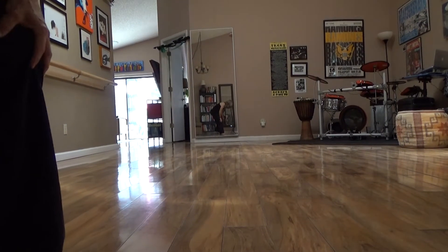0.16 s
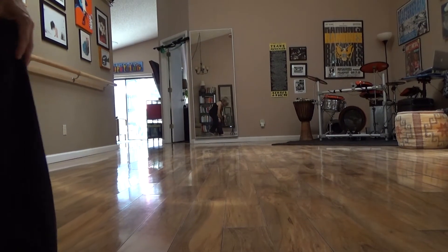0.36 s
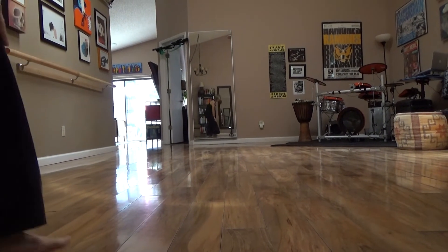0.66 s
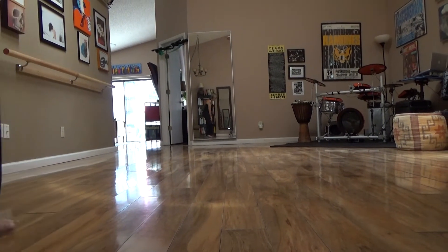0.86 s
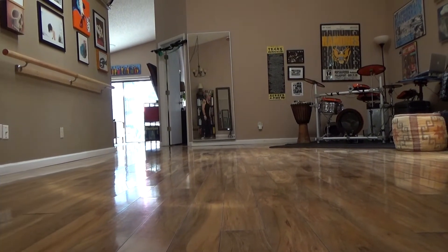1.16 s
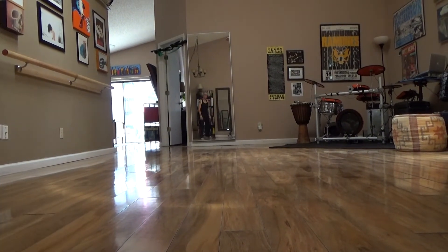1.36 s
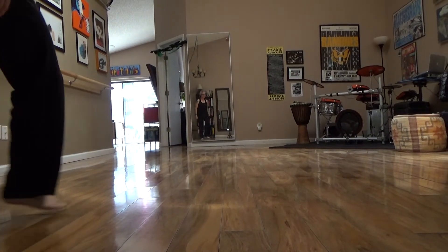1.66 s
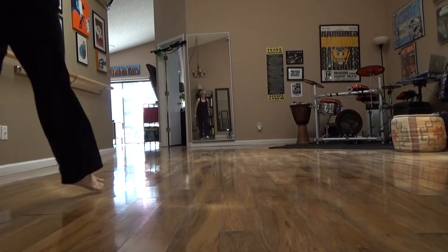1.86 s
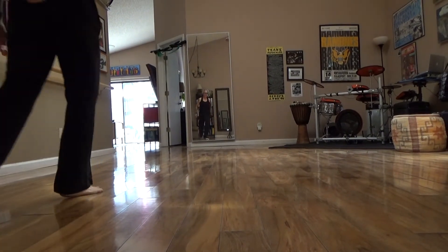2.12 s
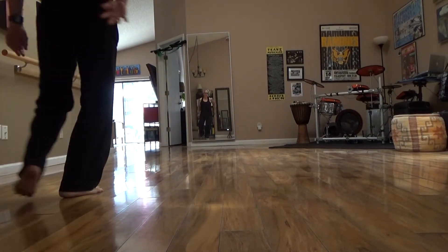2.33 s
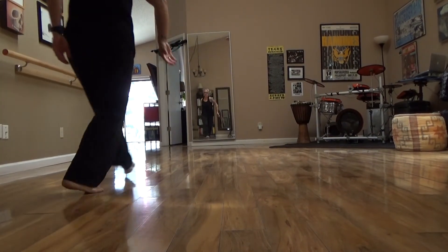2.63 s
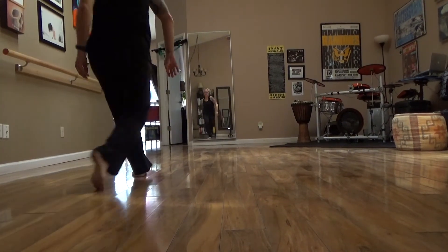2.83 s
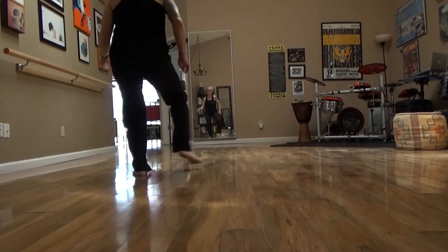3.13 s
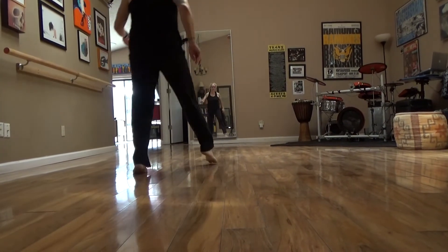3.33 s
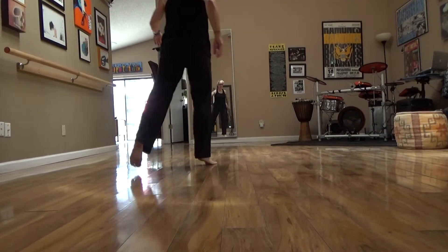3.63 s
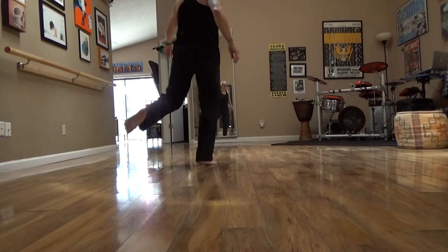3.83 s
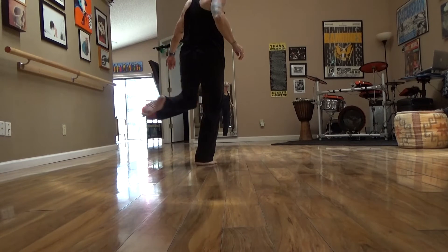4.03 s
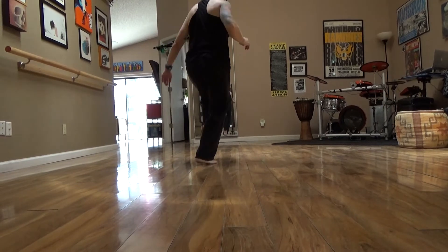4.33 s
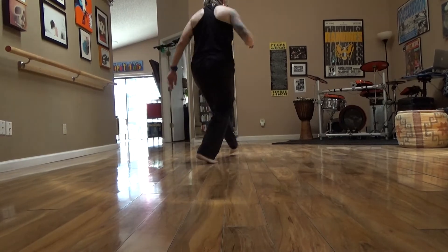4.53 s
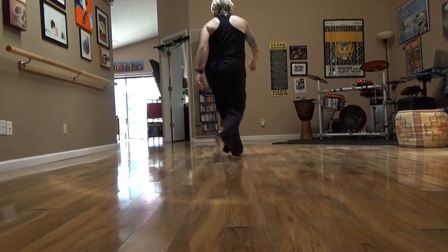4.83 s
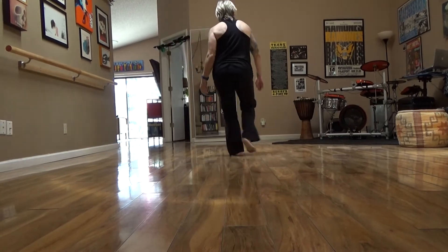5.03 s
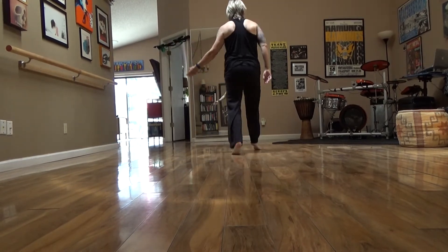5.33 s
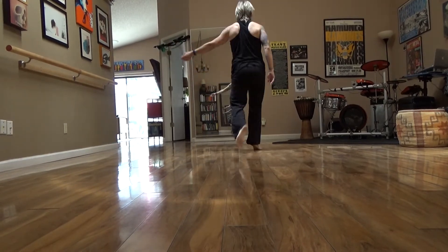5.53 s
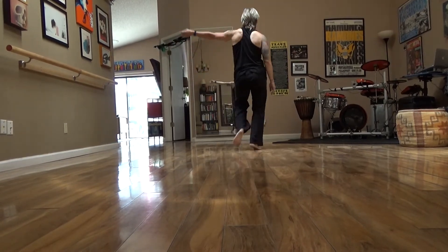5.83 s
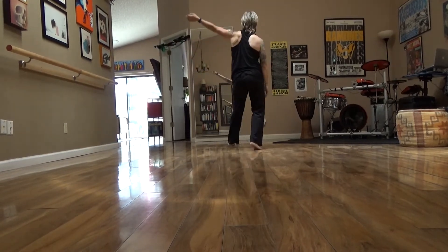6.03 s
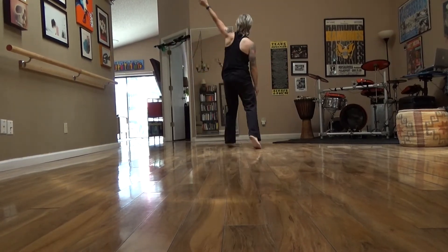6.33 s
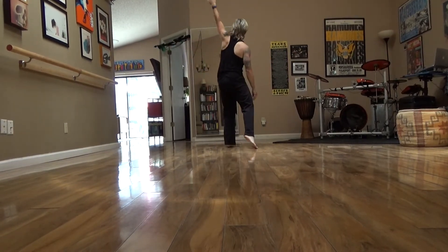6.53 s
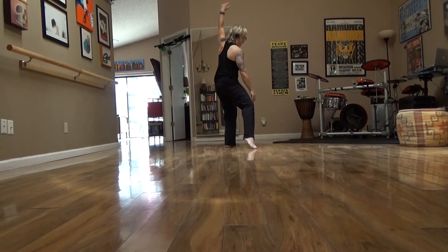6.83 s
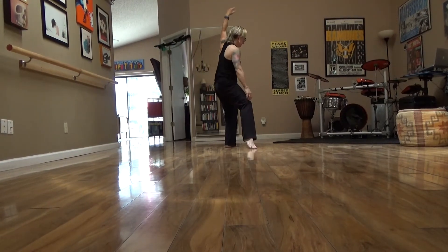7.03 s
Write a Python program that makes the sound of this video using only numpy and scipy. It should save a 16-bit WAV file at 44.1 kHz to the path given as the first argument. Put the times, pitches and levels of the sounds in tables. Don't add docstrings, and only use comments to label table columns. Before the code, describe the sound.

Bare feet rub, stick and step on a varnished wood floor right beside a low microphone, slightly left. Short dry cracks, sticky peels and light ticks come in irregular clusters, the boards ringing briefly. The walker then moves off into a lively hard-walled room, steps becoming duller and more echoing. Steady ventilation rumble, faint mains hum, a slow fan throb and soft hiss continue throughout.

```python
import sys
import numpy as np
from scipy import signal
from scipy.fft import rfft, irfft
from scipy.io import wavfile
from scipy.ndimage import uniform_filter1d

SR = 44100
rng = np.random.default_rng(int(sys.argv[2]) if len(sys.argv) > 2 else 0)


def nominal_scale(level):
    x = np.asarray(level, float) / 20
    return 10 ** x


def wav_record(signal):
    frames = np.transpose(np.atleast_2d(signal))
    bounded = np.clip(frames, -1, 1)
    quanta = np.round(bounded * 32767).astype(np.int16)
    wavfile.write(sys.argv[1], SR, quanta)


N = 316139

# f/Hz, level/dB [dB per Hz]
AIR_SPECTRUM = [(20, -24), (48, 1), (70, -2), (105, -5.5), (160, -4), (215, -9.5), (300, -19), (480, -24),
                (1030, -29), (1700, -33), (2600, -37), (9000, -42), (12000, -44), (16000, -49)]
# f/Hz, level/dB [dB per Hz]
AIR_SIDE_SPECTRUM = [(40, -89), (125, -42), (250, -32), (500, -31), (1000, -31.5), (2000, -37),
                     (4000, -43.5), (8000, -59), (16000, -76)]
# f/Hz, width/Hz, level/dB
HUM_LINES = [
    (119.6, 6.5, -55.5),
    (242, 4.9, -66.5),
    (358, 10, -73),
    (395.6, 1.65, -71.5),
    (1015, 33, -75.5),
]
# t/s [into the turn], level/dB
FAN_KNOCKS = [
    (.07, -2),
    (.19, 0.5),
]
# f/Hz, level/dB, t60/s
ROOM_TAIL = [(525, -32.5, 1), (840, -4.5, 0.79), (1330, -15.5, 1), (2130, -18, 0.99), (3280, -2, 0.77),
             (4230, -2.5, 0.71), (7160, 4, 0.41), (7700, 5.5, 0.7), (11800, 7, 0.17), (15000, -11, .4)]
# f/Hz, level/dB [side minus mid]
ROOM_SIDE_SPECTRUM = [(300, -16), (1000, -12), (3000, -8), (8000, -30), (15000, -53)]
# t/s [delay], level/dB
WALL_ECHOES = [
    (.0137, 4),
    (.0218, 6),
    (.0412, 3),
    (.054, -5),
]
# t/s, pan/dB [left minus right], wall echo level/dB, edge level/dB
WALK = [
    (0, 6, -17, 5),
    (1.5, 6.5, -25, 2.5),
    (2.0, 4, -23, -1.5),
    (2.9, 4.5, -20, -1),
    (3.5, 2, -27, 2.5),
    (4.4, 1.8, -17, -1),
    (5.3, 1, -15, 1),
    (5.7, 0.5, -4, -1.5),
    (7.17, 4.5, -20, -4.5),
]
# t/s [fastest], level/dB, rise/s, fall/s
RUBS = [(0.05, -43.5, .09, 0.056), (0.26, -66, .09, .07), (0.405, -52.5, 0.054, .07),
        (0.59, -45, .11, 0.096), (0.77, -58, .04, 0.12), (1.105, -52.5, 0.019, 0.099),
        (1.336, -53, 0.18, 0.17), (1.69, -53.5, .07, 0.14), (3.33, -52, 0.047, .05),
        (3.45, -50.5, 0.097, 0.045), (4.21, -61, .04, .06), (5.36, -53, .03, .04), (5.465, -47, 0.035, .11)]
# t/s, level/dB
BOARD_SONG = [
    (0.53, -71),
    (0.584, -51),
    (0.74, -59),
]
# t/s, peak level/dB, ring f/Hz, body
# level/dB
PEELS = [(0.0363, -27.5, 8600, -3.5), (0.046, -36, 3830, -2), (0.1354, -43, 1120, 9),
         (0.4518, -42, 3720, 0), (0.5668, -34, 1820, -17), (0.5804, -38, 2640, 8), (0.669, -36, 1680, -1),
         (0.6944, -40.5, 1740, 6), (1.2784, -42, 3230, -6), (1.3432, -38.5, 3790, -10),
         (1.348, -41, 3640, 2), (1.406, -42.5, 3010, -3), (1.4133, -38.5, 4700, -5),
         (1.4223, -35.5, 3430, 3), (1.6667, -33.5, 8900, -6), (1.6711, -51, 8900, 6),
         (2.1627, -36.5, 1800, -6), (2.1741, -33.5, 4650, 1), (2.2473, -38.5, 2760, 4),
         (2.7835, -37, 3040, -10), (3.3363, -51, 970, 6), (3.5373, -36, 6300, -9), (3.553, -41, 8830, -11),
         (4.8104, -44, 8350, -5), (4.852, -41, 4740, -4), (5.3935, -39.5, 2630, -15),
         (5.5069, -41, 1460, 1), (5.532, -41, 1610, -2), (6.74, -39.5, 4540, -2), (6.748, -36, 4520, -8)]
# t/s, peak level/dB, ring f/Hz, edge level/dB
TICKS = [(0.015, -35, 9990, -1), (0.1468, -32.5, 860, -16), (0.2927, -50, 3270, -7),
         (0.3154, -40.5, 2800, -18), (0.3357, -45, 3450, -11), (0.3699, -44, 2520, -13),
         (0.953, -41, 3490, -12), (1.1914, -41.5, 3620, -15), (1.8793, -42, 1710, -24),
         (1.9966, -42, 2450, -12), (2.2039, -32.5, 1070, -14), (2.8691, -24.5, 1640, -4),
         (3.493, -42, 3270, -12), (3.6437, -32.5, 2320, -13), (3.6646, -36, 1540, -13),
         (5.1636, -31.5, 2300, -10), (6.1692, -39, 2840, -18), (6.2631, -38.5, 2760, -2),
         (6.326, -29, 5630, 7), (6.42, -34, 5130, -4), (0.4676, -41, 2600, -12), (0.5135, -43, 3970, -18),
         (0.607, -44, 4400, -8), (0.7244, -45, 7880, -1), (5.9343, -30, 6500, -8), (6.31, -49, 2685, -12),
         (6.453, -38.5, 4000, -12), (6.7855, -37.5, 2500, -12), (0.6826, -28.5, 1670, -10),
         (1.405, -40, 3000, -12)]
# t/s, peak level/dB, ring f/Hz, body level/dB, room send level/dB
CRACKS = [(0.0297, -20.5, 2130, -2, -28), (0.521, -34.5, 6900, 1, 2), (0.5751, -19.5, 3900, -1, -9.5),
          (0.622, -34, 1750, -9, -3), (0.681, -21.5, 8400, -3, -30), (1.2759, -29, 3720, 6.5, -6),
          (2.0349, -16.5, 3216, -6.5, -2.5), (2.0665, -26.5, 4570, -18, 0.5), (2.8089, -30, 2470, -0.5, 5),
          (2.8612, -19, 8550, -15, -13), (3.3204, -27, 8900, 1, -1.5), (3.5098, -29, 2820, -3, 7.5),
          (3.9181, -30.5, 1430, -11, 1), (4.1376, -27, 2300, -19, -1.5), (4.789, -28, 10200, -18, -1.5),
          (4.8359, -27.5, 9690, -10, -3), (5.1281, -34, 2270, -4.5, 9), (5.1519, -26.5, 6890, -10, -13),
          (5.361, -36.5, 2810, 0, 10.5), (5.4717, -34, 2780, 0.5, 7.5), (5.784, -19.5, 3800, -8.5, 6.5),
          (5.882, -16.5, 8840, -6, 2), (6.3057, -32, 6000, -2.5, 6), (6.7313, -31, 1656, -0.5, 8)]

THROB_PERIOD_S, THROB_TOP_S = .5195, .19
BOARD_HZ = 1670


def colour(x, table):
    hz, db = np.transpose(table)
    n = x.shape[-1]
    log_hz = np.log(np.maximum(np.arange(n // 2 + 1) * SR / n, 1))
    return irfft(rfft(x) * nominal_scale(np.interp(log_hz, np.log(hz), db)), n)


def band(x, hz, width):
    return signal.lfilter(*signal.iirpeak(hz, hz / width, SR), x)


def unit(x):
    return x / np.sqrt(np.mean(x ** 2))


def curve(table):
    s, *columns = np.transpose(table)
    return [np.interp(np.arange(N) / SR, s, column) for column in columns]


def stereo(mid, side):
    return np.array([mid + side, mid - side])


def air():
    noise = rng.standard_normal((2, N + N % 2))
    mid = colour(noise[0], AIR_SPECTRUM)[:N]
    side = colour(noise[1], AIR_SIDE_SPECTRUM)[:N]
    scale = nominal_scale(-44.5) / np.std(mid)
    deep = signal.sosfiltfilt(signal.butter(3, 97, fs=SR, output="sos"), mid)
    low = signal.sosfiltfilt(signal.butter(2, 280, fs=SR, output="sos"), mid)
    upper = low - deep
    hiss = mid - low
    deep = deep + 0.14 * band(deep, 65, 11.8)
    lag_s = 0.11
    throb = np.cos(2 * np.pi * (np.arange(N) / SR - THROB_TOP_S - lag_s) / THROB_PERIOD_S)
    return scale * stereo(deep + upper * nominal_scale(0.2 * throb) + hiss, side)


def hum():
    out = np.zeros(N)
    for hz, width, db in HUM_LINES:
        line = band(band(rng.standard_normal(N), hz, width), hz, width)
        out += nominal_scale(db) * unit(line)
    for hz, db in [(405, -67.5), (119.9, -57)]:
        out += nominal_scale(db) * np.sqrt(2) * np.sin(2 * np.pi * hz * np.arange(N) / SR)
    return out


def fan():
    mode_hz, mode_width_hz, scatter_db = 71.3, 8.9, 1.2
    starts = np.arange(0, N / SR, THROB_PERIOD_S)
    knocks = np.zeros(N + SR)
    for s, db in FAN_KNOCKS:
        knocks[((starts + s) * SR).astype(int)] = nominal_scale(db + scatter_db * rng.standard_normal(len(starts)))
    thrum = band(band(knocks[:N], mode_hz, mode_width_hz), mode_hz, 2 * mode_width_hz)
    return nominal_scale(-48.5) * unit(thrum)


def room(x, echo_db):
    t = np.arange(SR) / SR
    swell = (1 - np.exp(-t / 0.034)) ** 0.81
    echoes = sum(nominal_scale(db) * np.exp(-((t - s) / 0.0023) ** 2) for s, db in WALL_ECHOES)
    tail = 0
    for hz, db, t60 in ROOM_TAIL:
        noise = band(rng.standard_normal((2, SR)), hz, .5 * hz) / np.sqrt(hz / 4000)
        tail = tail + nominal_scale(db - 60 * t / t60) * noise
    tail = stereo(tail[0], colour(tail[1], ROOM_SIDE_SPECTRUM)) * nominal_scale(-20.5)
    late = signal.oaconvolve(x[None], tail * swell, axes=1)[:, :N]
    early = signal.oaconvolve((x * nominal_scale(echo_db))[None], (tail * echoes)[:, :4096], axes=1)[:, :N]
    return late + early


def strides(s, rise_s, fall_s):
    t = np.arange(N) / SR - s
    return np.maximum(-t / max(rise_s, .005), t / max(fall_s, .005))


def rubs():
    grain = nominal_scale(2.6 * rng.exponential(size=N // 44 + 1)).repeat(44)[:N]
    noise = unit(rng.standard_normal(N) * uniform_filter1d(grain, size=44))
    dull, bright = unit(band(noise, 2800, 2500)), unit(band(noise, 7200, 3300))
    bright_share = 0.29
    fade_db = -16.5
    speed = sum(nominal_scale(db + fade_db * strides(s, rise_s, fall_s)) for s, db, rise_s, fall_s in RUBS)
    rub = speed * nominal_scale(-8.0) * (np.sqrt(1 - bright_share) * dull + np.sqrt(bright_share) * bright)
    start, end = (BOARD_SONG[0][0] - .02, -100), (BOARD_SONG[-1][0] + .02, -100)
    board_db, = curve([start] + list(BOARD_SONG) + [end])
    board = unit(band(band(noise, BOARD_HZ, 330), BOARD_HZ, 660))
    return rub + nominal_scale(board_db - 8.0) * board


def burst(grit, shape, hz, body_db, edge_db):
    edge_db = edge_db + 1.5 * np.log2(hz / 4000)
    tone = [(200, body_db + 5.5), (600, body_db), (1200, body_db), (1800, -2.0), (5500, -4.5),
            (7500, edge_db), (10000, edge_db), (13000, edge_db - 11.5), (17000, edge_db - 24)]
    spectrum = rfft(grit * shape)
    even = colour(irfft(spectrum / np.abs(spectrum)), [(f, 0.98 * db) for f, db in tone])
    near = colour(irfft(spectrum / np.sqrt(np.abs(spectrum))) * shape ** 0.084, tone)
    near = near + 1.4 * band(near, hz, 500 + .1 * hz)
    near = near + 0.15 * band(near, BOARD_HZ, 840)
    rebound_s = max(round(.0011 * hz), 1) / hz
    near = near + nominal_scale(-9.5) * np.roll(near, int(rebound_s * SR))
    return near / np.abs(near).max(), 0.029 * unit(even)


def creep():
    t = (np.arange(1024) - 256) / SR
    return np.exp(np.minimum(t, 0) / .003 - np.maximum(t, 0) / .005)


def snap():
    t = (np.arange(1024) - 256) / SR
    return np.exp(-np.abs(t) / .00027) + .17 * creep()


def contacts(rows, shape, walk_edge_db):
    out = np.zeros((2, N + 1024))
    for s, db, hz, body_db, send_db, edge_db in rows:
        grit = rng.standard_normal(1024)
        near, send = burst(grit, shape, hz, body_db, edge_db + walk_edge_db[int(s * SR)])
        i = int(s * SR) - 256
        out[:, i:i + 1024] += [near * nominal_scale(db), send * nominal_scale(db + send_db)]
    return out[:, :N]


def peels(walk_edge_db):
    rows = [(*row, -7, -10.5) for row in PEELS]
    return contacts(rows, creep(), walk_edge_db)


def ticks(walk_edge_db):
    rows = []
    for s, db, hz, edge_db in TICKS:
        body_db = -5 - 7 * np.log2(hz / 2500)
        rows.append((s, db, hz, body_db, -5.5, edge_db))
    return contacts(rows, snap(), walk_edge_db)


def cracks(walk_edge_db):
    rows = [(*row, -9) for row in CRACKS]
    return contacts(rows, snap(), walk_edge_db)


def scene():
    pan_db, echo_db, edge_db = curve(WALK)
    background = air() + hum() + fan()
    rub = rubs()
    direct, send = peels(edge_db) + ticks(edge_db) + cracks(edge_db)
    mid = direct + rub
    side = colour(np.append(mid, 0), [(200, -24), (1000, -3.0), (8000, 2.5), (13000, -13.5)])[:N]
    side = side * (nominal_scale(pan_db) - 1) / (nominal_scale(pan_db) + 1)
    return stereo(mid, side) + room(send + rub * nominal_scale(-19.0), echo_db) + background


def low_pass(x):
    return signal.sosfilt(signal.butter(12, 16520, fs=SR, output="sos"), x)


def record(dry):
    mix = signal.sosfilt(signal.ellip(10, .3, 40, 16100, fs=SR, output="sos"), dry)
    mix = signal.sosfilt(signal.butter(4, 29, "high", fs=SR, output="sos"), mix)
    return low_pass(mix)


dry = scene()
out = record(dry)
wav_record(out)
```